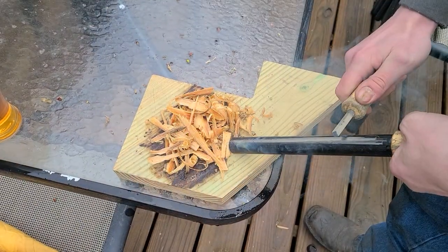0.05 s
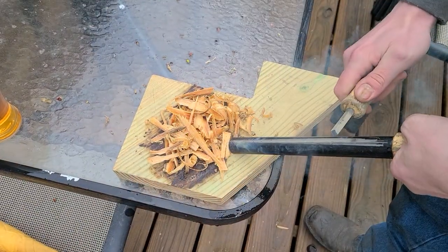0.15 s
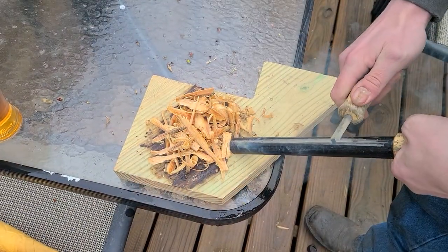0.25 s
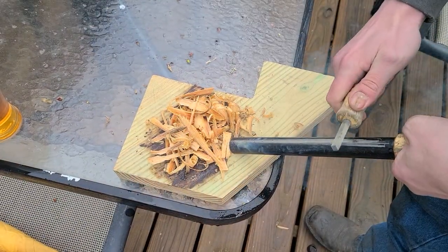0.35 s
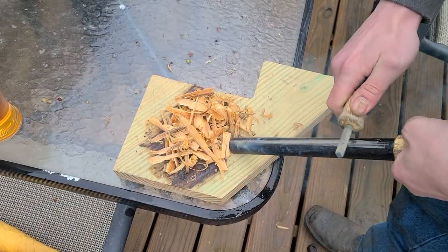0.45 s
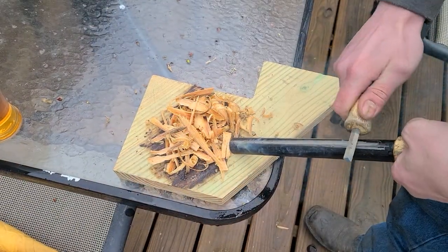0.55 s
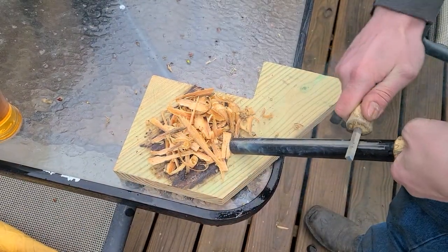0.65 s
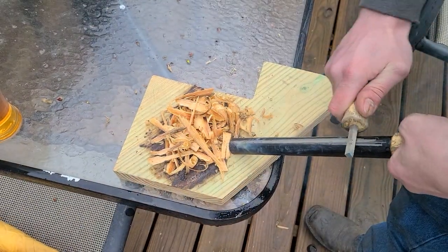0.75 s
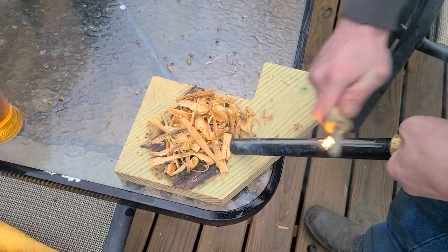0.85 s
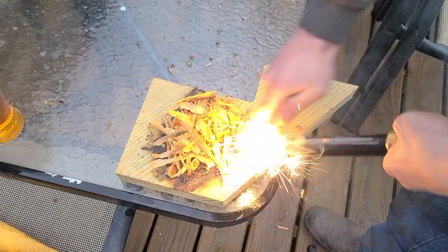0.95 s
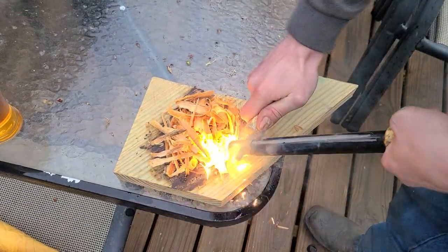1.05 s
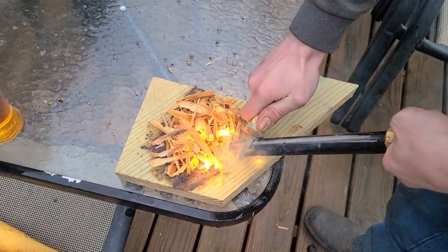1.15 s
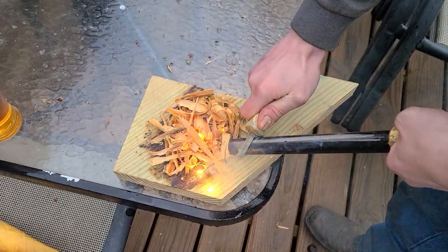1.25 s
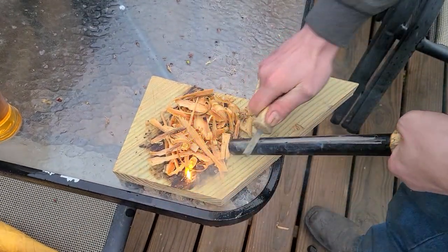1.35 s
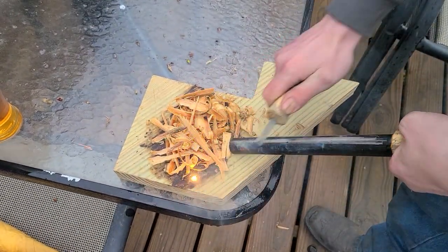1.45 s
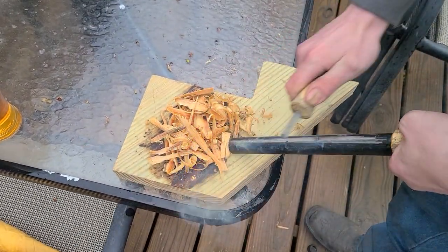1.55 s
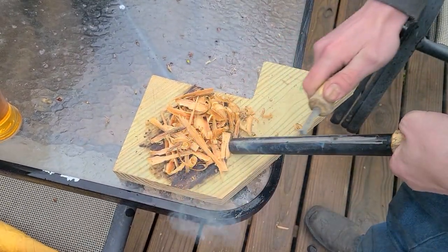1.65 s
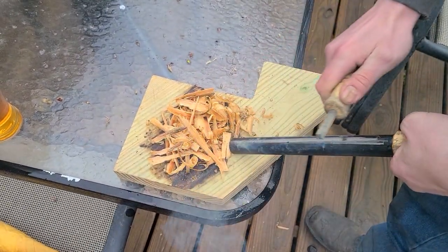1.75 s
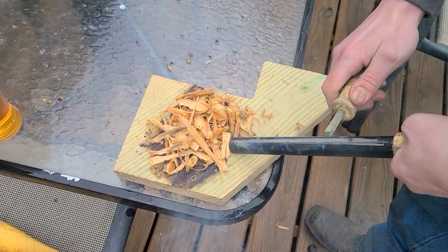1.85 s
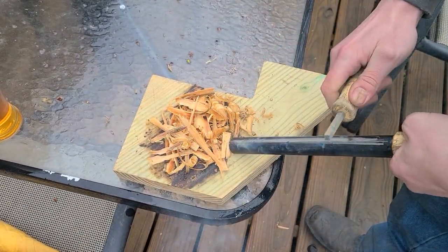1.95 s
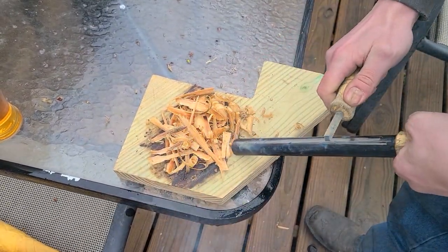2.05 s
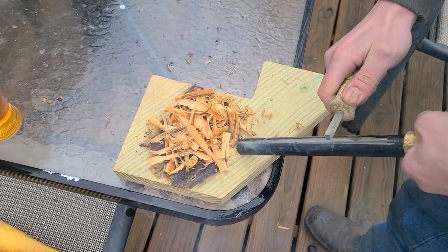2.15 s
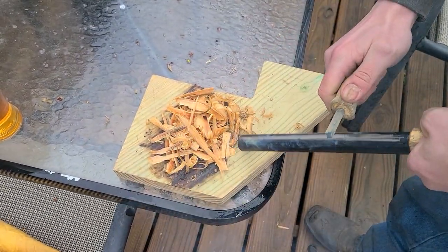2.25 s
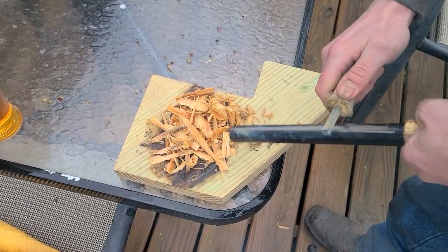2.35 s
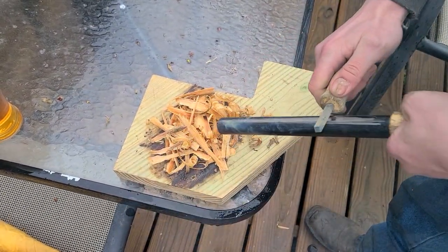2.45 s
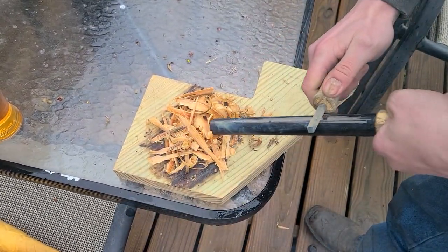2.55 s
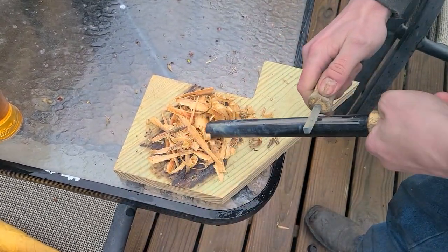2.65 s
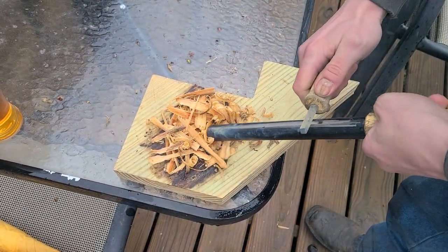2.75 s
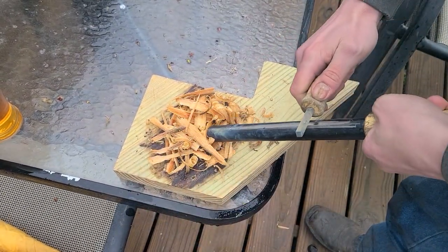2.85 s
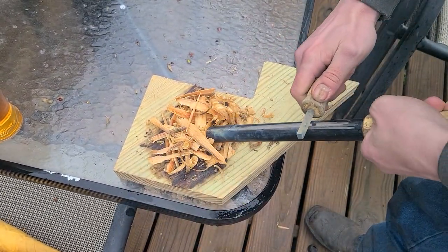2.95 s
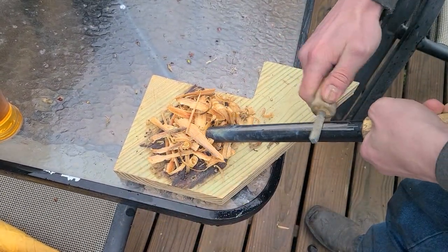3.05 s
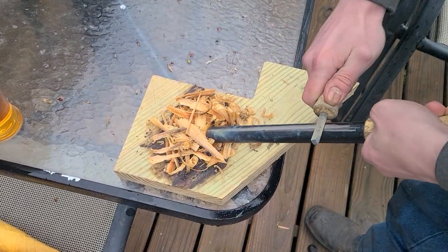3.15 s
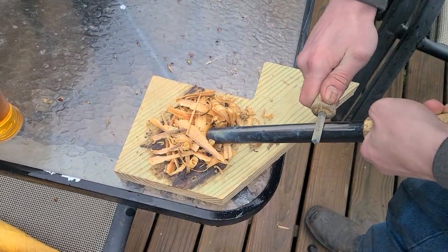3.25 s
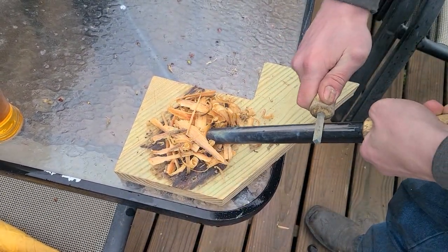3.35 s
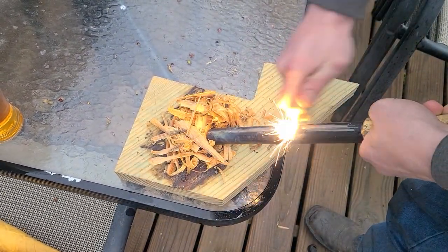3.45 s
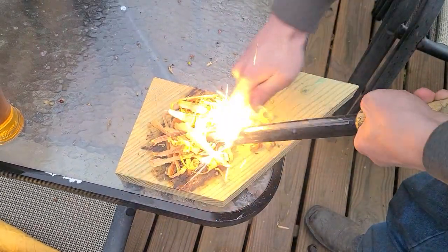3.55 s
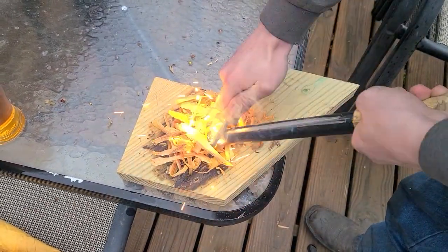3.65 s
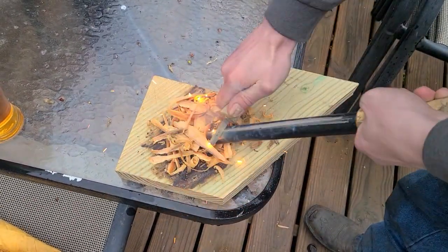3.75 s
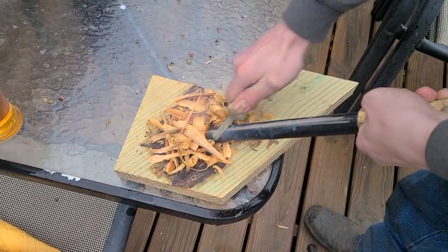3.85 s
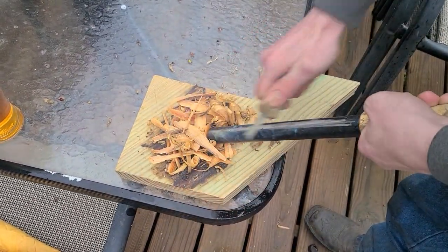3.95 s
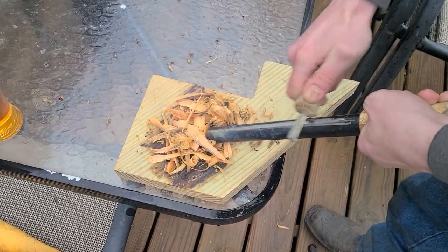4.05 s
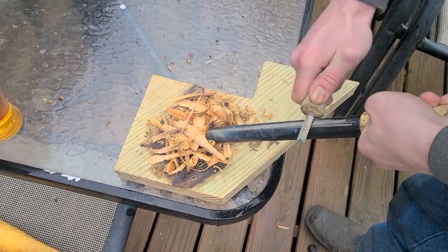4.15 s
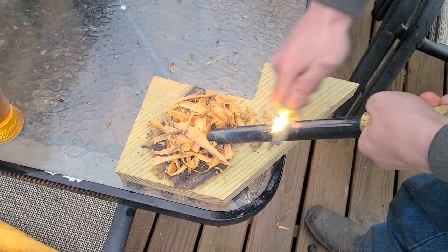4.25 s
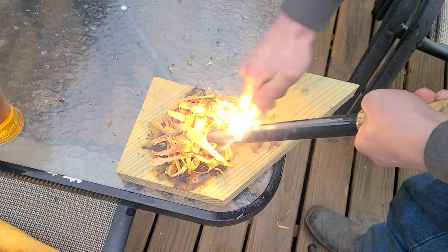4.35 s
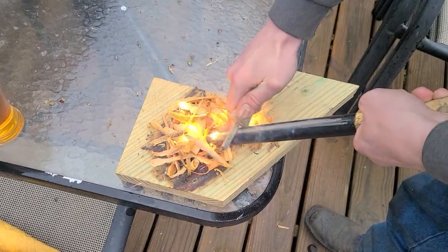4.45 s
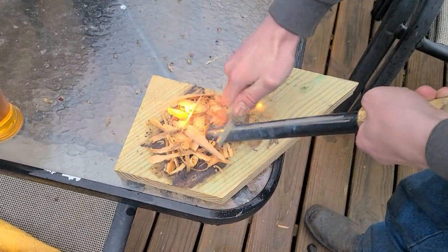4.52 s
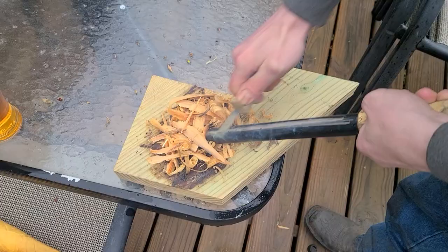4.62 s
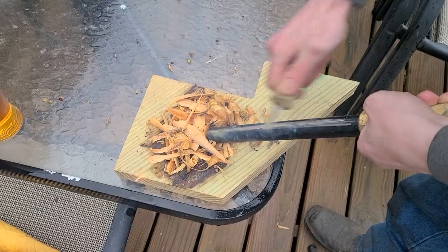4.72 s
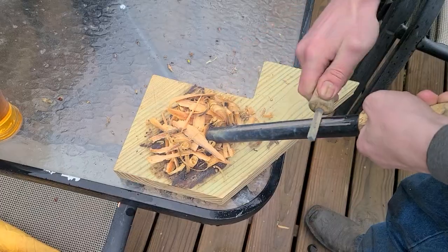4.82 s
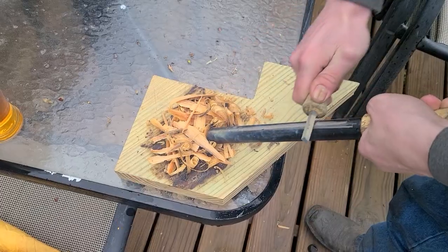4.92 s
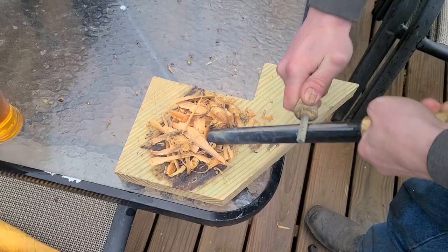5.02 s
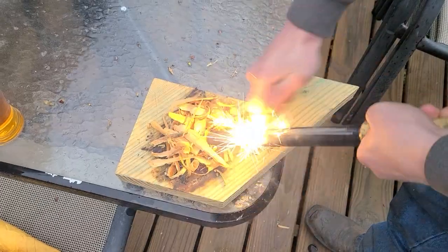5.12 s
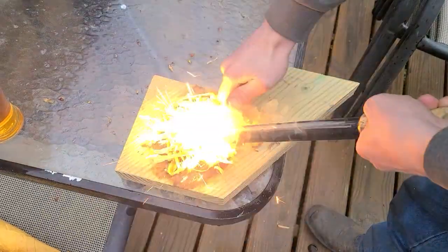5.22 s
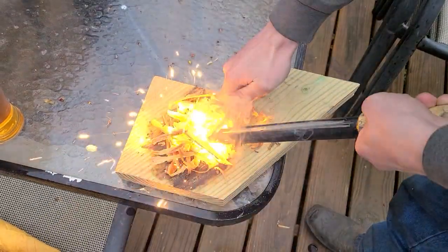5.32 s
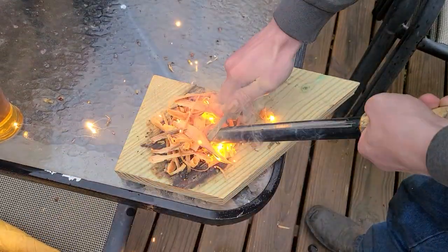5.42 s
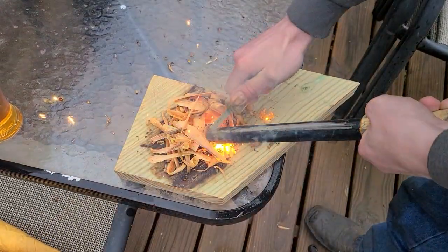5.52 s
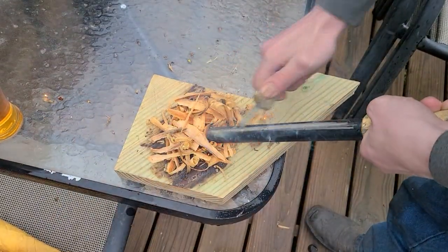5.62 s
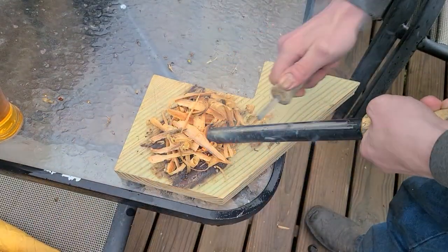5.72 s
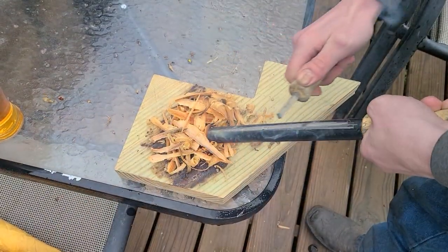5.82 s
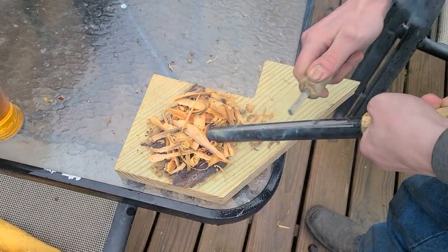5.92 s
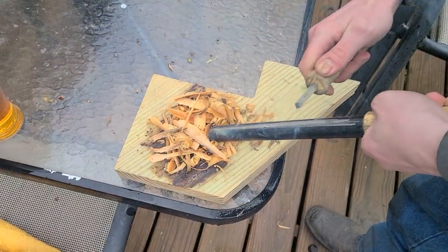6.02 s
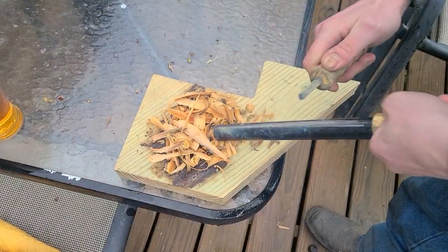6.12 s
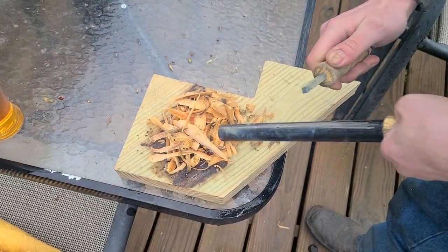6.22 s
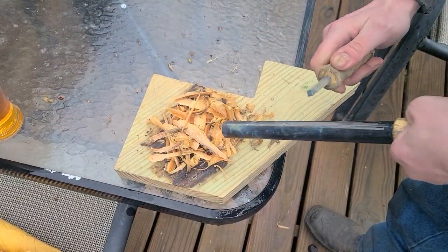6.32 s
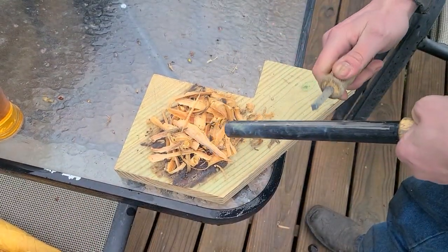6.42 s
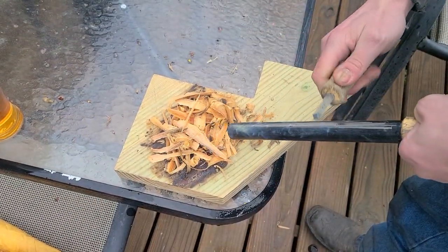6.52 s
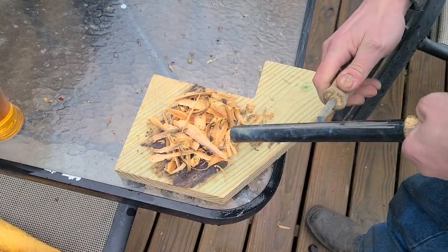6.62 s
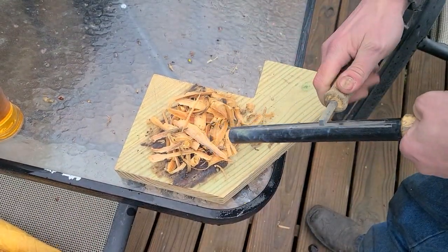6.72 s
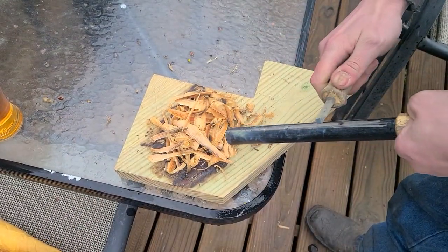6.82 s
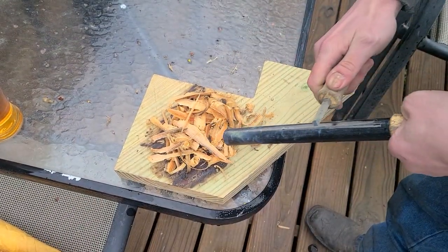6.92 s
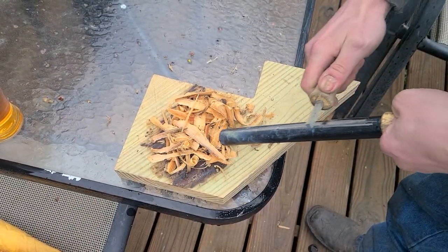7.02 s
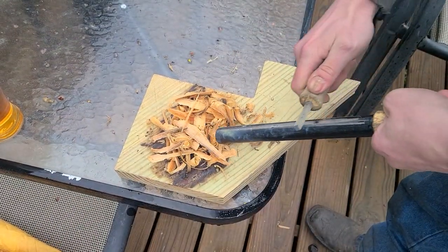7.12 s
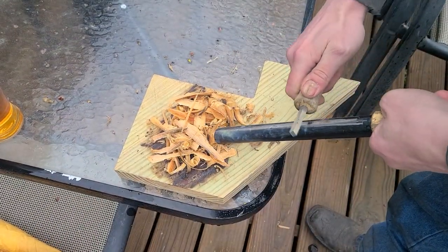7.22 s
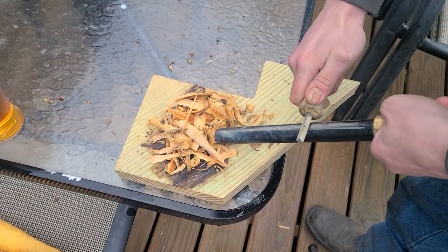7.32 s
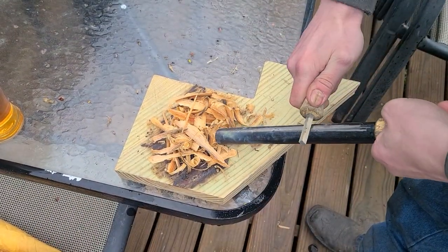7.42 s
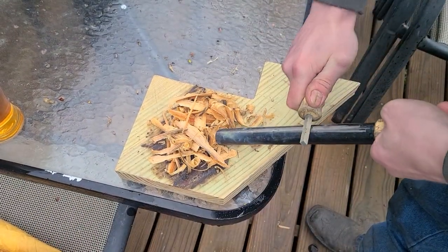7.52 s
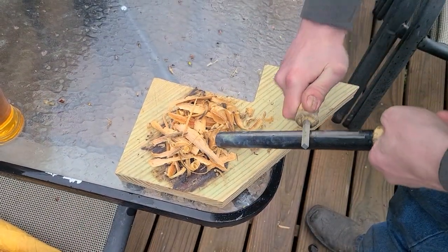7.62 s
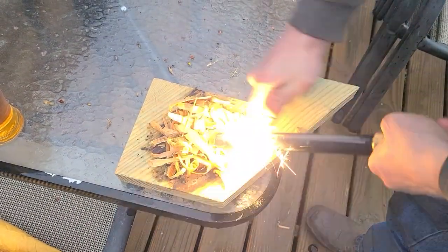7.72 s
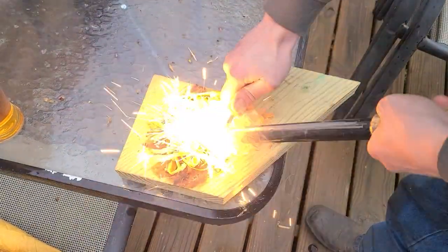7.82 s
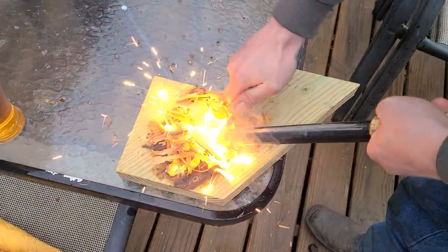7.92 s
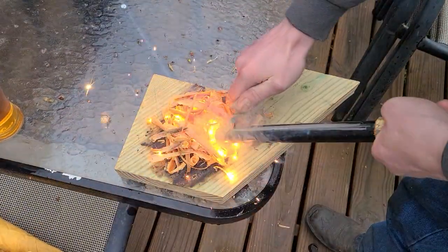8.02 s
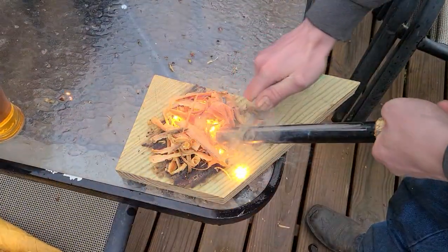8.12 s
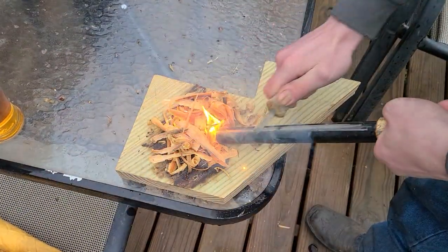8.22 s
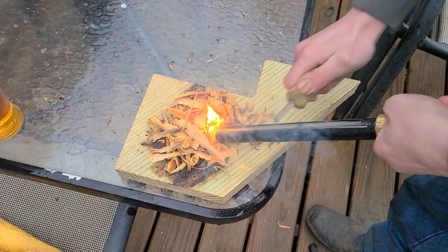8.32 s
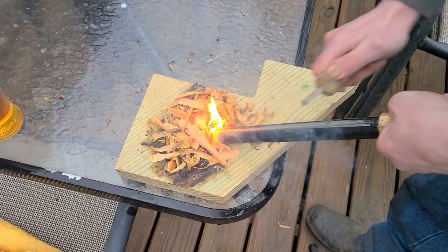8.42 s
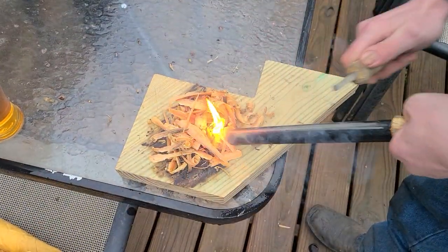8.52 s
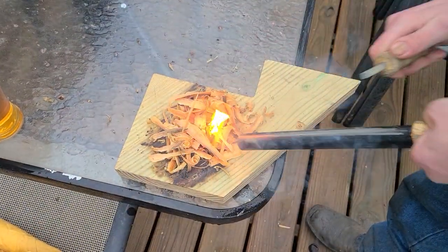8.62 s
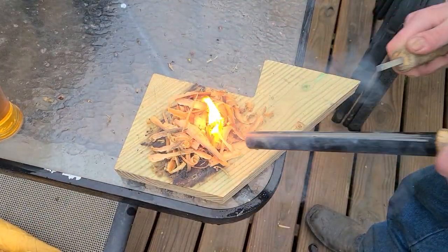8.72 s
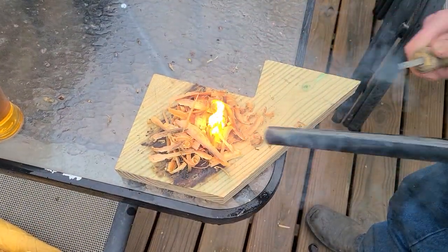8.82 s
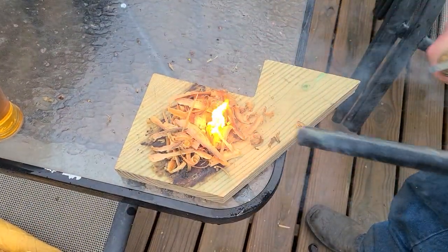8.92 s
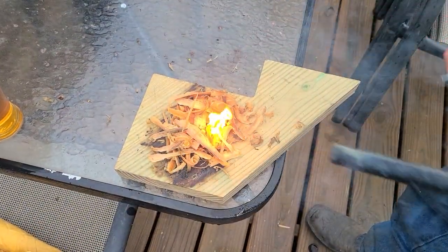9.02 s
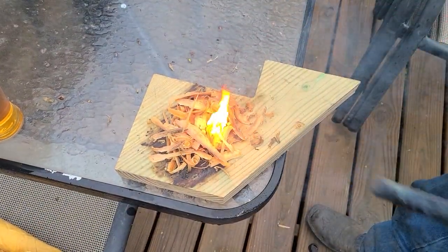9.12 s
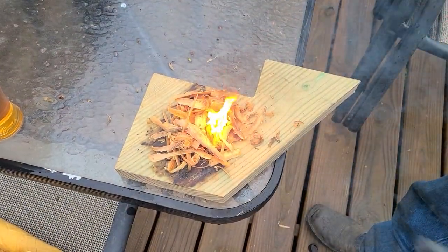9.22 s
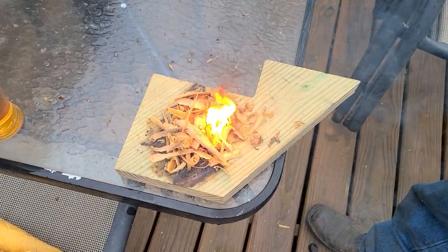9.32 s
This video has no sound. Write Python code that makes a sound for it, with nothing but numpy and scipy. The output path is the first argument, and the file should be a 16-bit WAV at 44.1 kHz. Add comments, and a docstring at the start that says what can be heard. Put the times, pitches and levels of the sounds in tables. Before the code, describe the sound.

A wren's quick chirping phrases echo among houses above distant traffic and a low engine hum. Nearby, small ticks and bright metallic taps lead into gritty scrapes of steel on a rod, spaced irregularly, with one more squealing and the final one loud and woody. Each leaves a light dying crackle. Close handheld stereo pickup in open air, bright hand sounds leaning right.

```python
"""A wren sings in gliding notes among echoing houses over droning traffic, and small steel ticks begin.
Then sharp taps, ringing steel modes, set a scraper on a thick spark rod, and five strokes drive it along:
gritty noise gives the hiss, resonances fed by uneven catches give the rasp and squeal.
The rod's tip shakes a board on a glass garden table, adding dull knocks; light crackle fills the gaps.
A phone's two microphones hear the treble of the hands from the right."""
import sys
import numpy as np
from scipy import signal
from scipy.fft import rfft, irfft, next_fast_len
from scipy.io import wavfile
from scipy.ndimage import uniform_filter1d, map_coordinates

SR = 44100
rng = np.random.default_rng(int(sys.argv[2]) if len(sys.argv) > 2 else 0)


def bounce(signal):
    """Save signal as a 16-bit WAV file at the path given by the first command-line argument."""
    frames = np.transpose(np.atleast_2d(signal))
    limited = np.clip(frames, -1, 1)
    pcm = np.round(limited * 32767).astype(np.int16)
    wavfile.write(sys.argv[1], SR, pcm)


def nominal_scale(level):
    """Amplitude ratio for a level in decibels (scalar or array-like)."""
    x = np.asarray(level, float) / 20
    return 10 ** x


N = 413216  # length [samples]


def unit(x):
    """Bring to rms 1."""
    return x / np.sqrt(np.mean(x ** 2) + 1e-20)


def along(points, hz):
    """Read (frequency, value) points on a log frequency axis."""
    f, v = np.transpose(points)
    return np.interp(np.log(hz + 1), np.log(f + 1), v)


def curves(rows):
    """One value per sample for each column after the time."""
    s, *cols = np.transpose(rows)
    return [np.interp(np.arange(N) / SR, s, c) for c in cols]


def spans(tables, fade):
    """Join tables of levels, 30 dB down between them; each dies five times slower than it starts."""
    def hushed(s, row):
        return (s, *np.subtract(row[1:], 30))

    rows = []
    for table in tables:
        first, last = table[0], table[-1]
        rows += [hushed(first[0] - fade, first), *table, hushed(last[0] + 5 * fade, last)]
    return curves(sorted(rows))


def wobble(rate):
    """A smooth random curve, rate knots a second."""
    return map_coordinates(rng.standard_normal(int(N * rate / SR) + 4), [np.arange(N) * rate / SR])


def gate(start, length, rise):
    """Time since the start, and a gain that swells over rise, holds and dies away over rise."""
    t = np.arange(N) / SR - start
    return t, np.clip(np.minimum(t, length + rise - t) / rise, 0, 1) ** 2


def filtered(x, response):
    """Shape x by a complex response of frequency."""
    m = next_fast_len(x.shape[-1] + SR // 2)
    spectrum = rfft(x, m) * response(np.fft.rfftfreq(m, 1 / SR))
    return irfft(spectrum, m)[..., :x.shape[-1]]


def modes(peaks):
    """Causal response of a few (frequency, width, level) resonances, alternating in sign."""
    def response(f):
        total = 0
        for k, (centre, width, db) in enumerate(peaks):
            damping = 1j * f * width
            total = total + (-1) ** k * nominal_scale(db) * damping / (centre * centre - f * f + damping)
        return total
    return response


def colour(spectrum):
    """Response of a (frequency, level) spectrum."""
    return lambda hz: nominal_scale(along(spectrum, hz))


def spread(pair, response, alike):
    """Two unrelated signals coloured and mixed to left and right, alike by frequency, rms 1."""
    def mid_side(hz):
        angle = np.arccos(np.clip(along(alike, hz), -1, 1)) / 2
        return response(hz) * [np.cos(angle), np.sin(angle)]

    mid, side = filtered(pair, mid_side)
    return unit(np.array([mid + side, mid - side]))


def grit(rate, scatter_db, smooth):
    """Noise over a smooth bed with tiny catches of unequal size, rate a second, shared by both sides."""
    sizes = nominal_scale(scatter_db * np.clip(rng.standard_normal(N), -2, 2))
    catches = (rng.random(N) < rate / SR) * sizes
    bursts = np.sqrt(np.abs(uniform_filter1d(catches ** 2, size=40)))
    return rng.standard_normal((2, N)) * (smooth + unit(bursts))


def patchy(x, depth_db):
    """Resonances shift as the contact moves: random gain in patches of pitch and time, rms 1."""
    z = signal.stft(x, nperseg=256)[2]
    field = uniform_filter1d(rng.standard_normal(z.shape[1:]), size=3, axis=0)
    field = uniform_filter1d(field, size=9, axis=1)
    return unit(signal.istft(z * nominal_scale(depth_db * unit(field)), nperseg=256)[1][:, :N])


def tail(length, t60):
    """Two dying noises, scaled to energy 1 by the left one."""
    t = np.arange(round(length * SR)) / SR
    x = rng.standard_normal((2, len(t))) * nominal_scale(-60 * t / t60)
    return x / np.linalg.norm(x[0])


def add(track, s, sound):
    """Mix a stereo sound in at time s."""
    i = round(s * SR)
    sound = sound[:, max(-i, 0):N - i]
    track[:, max(i, 0):max(i, 0) + sound.shape[1]] += sound


# strokes, one table each:
# (time [s], sliding speed as hiss level [dB], push on the board [dB], lean onto the table top [dB])
STROKES = [
    [(0.91, -77, -56, -52), (0.932, -56, -61, -60), (0.954, -45, -47.5, -52), (0.994, -39.5, -31, -37.5),
     (1.048, -33.5, -38, -52), (1.074, -38, -29.5, -35.5), (1.096, -38.5, -31, -40.5),
     (1.128, -45, -39, -51)],
    [(3.51, -74, -52, -59), (3.526, -51, -62, -57), (3.55, -43, -41.5, -42), (3.586, -37, -41.5, -48),
     (3.712, -40.5, -49, -33), (3.73, -46.5, -52.5, -37), (3.758, -55, -50, -53.5), (3.78, -77, -49.5, -44)],
    [(4.31, -65.5, -52, -52), (4.352, -35, -49, -48.5), (4.388, -40.5, -45, -65), (4.51, -42.5, -49.5, -33),
     (4.556, -73, -53, -46), (4.602, -52, -50.5, -43), (4.678, -70, -64, -50), (4.7, -82, -54.5, -50.5)],
    [(5.15, -68, -46.5, -54), (5.17, -36, -36, -47), (5.206, -38, -34.5, -42), (5.282, -28, -36.5, -29),
     (5.334, -42, -35, -45), (5.382, -54.5, -53, -55), (5.406, -66, -54, -73), (5.42, -55, -62, -50)],
    [(7.775, -45.5, -55, -53), (7.791, -41.5, -29.5, -44), (7.817, -32, -28.5, -37.5),
     (7.841, -29, -28, -33.5), (7.879, -31.5, -23.5, -29.5), (7.911, -41.5, -33.5, -45.5),
     (7.96, -50, -58, -49.5)],
]
# how the edge is held in each stroke: (blade rasp [dB], blade squeal [dB], rod rasp [dB])
GRIPS = [(2, 0.5, 1.5), (0.5, 5, -3), (4, -2.5, -.6), (1.1, -1, -0.1), (1.5, 0.3, 3.5)]
# colour of the torn grains: (frequency [Hz], relative level [dB])
HISS_SPECTRUM = [(2820, -27.5), (4800, -12), (5890, -0.5), (6640, -1.5), (7300, -0.5), (8220, -10.5),
                 (9180, -16), (12000, -8), (13400, -10), (15800, -17)]
# scraper blade, lower modes: (frequency [Hz], width [Hz], level [dB])
BLADE_MODES = [(2705, 750, -1), (3720, 300, 0)]
# scraper blade, upper modes: (frequency [Hz], width [Hz], level [dB])
SQUEAL_MODES = [(3747, 420, -16), (4180, 740, 5)]
# rod: (frequency [Hz], width [Hz], level [dB])
ROD_MODES = [(760, 470, -9), (1230, 344, 0), (1606, 450, -0.5), (1950, 510, -3)]
# board under the tip: (frequency [Hz], width [Hz], level [dB])
BOARD_MODES = [(307, 41, -5), (380, 35, -1.5), (447, 74, -3.5)]
# glass table top: (frequency [Hz], width [Hz], level [dB])
TABLE_MODES = [(113, 110, -5.5), (183.4, 25, 4.5), (237.6, 17, -2.5)]
# stereo width of the hands: (frequency [Hz], left-right likeness [-1 to 1])
NEAR_ALIKE = [(60, 0.99), (130, 0.99), (290, 1), (640, 0.73), (1410, 0.63), (3100, 0.56), (6820, 0.27),
              (15000, 0.03)]


def strokes():
    """The edge tears grains off the rod: a dense hiss; blade and rod rasp; the tip shakes board and table."""
    slide_db, push_db, lean_db = spans(STROKES, fade=0.024)
    holds = []
    for rows, grip in zip(STROKES, GRIPS):
        start, end = rows[0][0], rows[-1][0] + .1
        holds += [(start, 0, *grip), (end, end - start, *grip)]
    since, blade_db, squeal_db, rod_db = curves(holds)
    force_db = np.maximum(push_db, lean_db)

    def drive(offset_db, force_share, rise_db_s):
        """Level led by sliding, partly by force, rising as the scraper nears the tip."""
        return offset_db + slide_db + force_share * (force_db - slide_db) + rise_db_s * since

    def skips(peaks):
        return spread(grit(220, scatter_db=3.5, smooth=2.0), modes(peaks), NEAR_ALIKE)

    chatter = wobble(60)  # the edge skips unevenly
    grains = spread(grit(1500, scatter_db=2.0, smooth=0.99), colour(HISS_SPECTRUM), NEAR_ALIKE)
    hiss = nominal_scale(2.6 + slide_db + 0.71 * chatter) * patchy(grains, depth_db=2.5)
    blade_gain = nominal_scale(drive(-5, force_share=0.14, rise_db_s=8.4) + blade_db + 1.3 * chatter)
    blade = blade_gain * patchy(skips(BLADE_MODES), depth_db=1.0)
    rod_gain = nominal_scale(drive(-4, force_share=0.27, rise_db_s=17) + rod_db + 4.2 * wobble(50))
    rod = rod_gain * patchy(skips(ROD_MODES), depth_db=1.5)
    squeal_gain = nominal_scale(drive(-5.5, force_share=0.14, rise_db_s=8) + squeal_db + 0.84 * wobble(45))
    squeal = squeal_gain * patchy(skips(SQUEAL_MODES), depth_db=0.5)
    board = nominal_scale(push_db - 1) * skips(BOARD_MODES)
    table = nominal_scale(lean_db + 2.2) * skips(TABLE_MODES)
    return hiss + blade + rod + squeal + board + table


# scraper set on the rod:
# (time [s], level [dB], modes below 3300 Hz [dB], modes above 7000 Hz [dB], left over right [dB])
TAPS = [(0.6339, -23.5, 6.5, -23, -8.5), (1.194, -27.5, -20, -6, -7), (3.1749, -11.5, 1.5, -14, -9),
        (4.2272, -3.5, -2.5, -21, -4.5), (4.9298, -7.5, -4.5, -22.5, -1), (7.385, -10, 0, -16.5, -4.5)]
# broad clack: (frequency [Hz], width [Hz], level [dB])
CLACK_MODES = [(1344, 960, -6), (2390, 580, 0.5), (3370, 780, -4), (4400, 660, -0.5), (5770, 530, 2.5),
               (7620, 750, 4), (10800, 900, 0.5)]
# ring of scraper and rod: (frequency [Hz], level [dB], t60 [s])
STEEL_RING = [(1420, -7.5, 0.011), (2145, -5.5, 0.023), (2420, -27, 0.092), (2747, -4.5, 0.024),
              (4405, -8.5, 0.037), (4700, -19, 0.017), (5460, -5, 0.01), (5780, -18.5, 0.05),
              (6030, -0.5, 0.0044), (7270, -10.5, 0.03), (10400, -0.5, 0.018), (12850, -4.5, 0.0033)]


def taps():
    """Each tap is a short clack and a faint ring, slightly retuned; the table top sends a duller smear."""
    out, t = np.zeros((2, N)), np.arange(SR // 8) / SR
    for s, db, low_db, top_db, pan_db in TAPS:
        def tilt(hz):
            return low_db if hz < 3300 else top_db if hz > 7000 else 0

        clack = modes([(hz * rng.normal(1, 0.011), w, g + tilt(hz)) for hz, w, g in CLACK_MODES])
        noise = .2 * rng.standard_normal((2, len(t))) * np.exp(-t / .001)
        blow = signal.unit_impulse(len(t), 24) + noise
        blow = uniform_filter1d(blow, size=2)  # steel meets steel for a few hundredths of a millisecond
        struck = filtered(blow, clack)
        struck = struck / np.abs(struck).max()
        ring = np.zeros_like(struck)
        for hz, level_db, t60 in STEEL_RING:
            wave = np.sin(2 * np.pi * hz * rng.normal(1, .012) * t + rng.normal(0, 1.0, (2, 1)))
            mode_db = level_db + tilt(hz) - 10.0 + rng.normal(0, 1.9)
            ring += nominal_scale(mode_db - 60 * t / t60) * wave * (1 - np.exp(-t / 0.0011))
        smear = signal.fftconvolve(struck + 0.47 * ring, tail(.15, t60=0.11), axes=1)
        smear = filtered(smear, lambda hz: 1 / (1 + 1j * hz / 6000))  # dulled above 6 kHz
        noise_ahead = unit(filtered(rng.standard_normal((2, len(t))), clack))
        noise_ahead = noise_ahead * np.exp((t - t[-1]) / 0.0041)
        gain = nominal_scale(db + 6.5 + np.array([[pan_db], [-pan_db]]) / 2)
        add(out, s - t[-1], gain * nominal_scale(-22.0) * noise_ahead)  # faint noise just ahead of the clack
        add(out, s, gain * (struck + ring))
        add(out, s + .002, gain * nominal_scale(-5.0) * smear)
    return out


# small ticks of steel edge, shavings and sparks: (time [s], level [dB], body over bright part [dB])
TICKS = [(.557, -50, -5.5), (.571, -43, -2), (.5838, -43.5, -4.5), (.6146, -52, -1), (1.2483, -30.5, -15),
         (1.3245, -42, 2), (1.3564, -45, 0.5), (1.5095, -49, -1), (1.5272, -35.5, -1.5), (2.496, -40, -10),
         (2.739, -47, -1), (2.8539, -32.5, -15.5), (2.8772, -32, -20), (2.9906, -33.5, -10.5),
         (3.027, -48, -1), (3.1086, -16, -25.5), (3.25, -40, -16), (3.3099, -31, -20), (3.3274, -37, -14.5),
         (4.3535, -23, -7), (4.4742, -22.5, 2.5), (4.5397, -41, -10.5), (4.6029, -39, -9),
         (5.3851, -42, 2.5), (5.5129, -39, -1.5), (5.557, -37.5, -4), (5.718, -47, -1.5),
         (5.7544, -35.5, -4.5), (5.7978, -42.5, -12), (6.126, -55, 4), (7.1112, -42.5, 7),
         (7.141, -34, -5.5), (7.2432, -51.5, 12), (7.2898, -57.5, 13), (7.7029, -43, 7), (7.7614, -57, -11),
         (7.9992, -31, -2.5), (8.019, -55.5, 5), (8.1833, -40.5, 2), (8.2487, -44, -3.5), (8.92, -49, -8.5),
         (9.195, -40.5, -14.5), (9.3362, -50.5, 11)]


def ticks():
    """Very short noise clicks with a weak fizz, through two bright resonances and a lower body."""
    bright, body, t = np.zeros((2, N)), np.zeros((2, N)), np.arange(SR // 10) / SR
    for s, db, body_db in TICKS:
        decay = nominal_scale(-60 * t / 0.0032) + 0.21 * nominal_scale(-60 * t / 0.066)  # click and fizz, t60 [s]
        click = rng.standard_normal((2, len(t))) * decay
        add(bright, s, nominal_scale(db - 0.5) * click)
        add(body, s, nominal_scale(db + body_db + 9) * click)
    bright = filtered(bright, modes([(6440, 910, 0.42), (12700, 1000, -1.5)]))
    return bright + filtered(body, modes([(3950, 1600, 0.0037)]))


# rod tip on the board: (time [s], level [dB])
KNOCKS = [(1.131, -25), (1.156, -10.5), (1.19, -22), (1.545, -25), (3.651, -26), (3.674, -25), (4.583, -20),
          (5.167, -28.5), (7.699, -23.5), (8.613, -30), (8.906, -28.5), (9.195, -28.5), (9.332, -31)]


def knocks():
    """Dull blows with a short rattle ring board and table top; the rod itself gives a brief clack."""
    blows, clacks, t = np.zeros((2, N)), np.zeros((2, N)), np.arange(SR // 20) / SR
    for s, db in KNOCKS:
        soft = (t / 0.00023) * np.exp(-t / 0.00032)
        rattle = 0.62 * uniform_filter1d(rng.standard_normal(len(t)), size=16) * nominal_scale(-60 * t / 0.14)
        add(blows, s, nominal_scale(db + 11.5) * np.array([soft + rattle] * 2))
        add(clacks, s, nominal_scale(db - 1 - 60 * t / 0.0098) * rng.standard_normal((2, len(t))))
    rod = filtered(clacks + nominal_scale(-6) * blows, modes(ROD_MODES))
    return filtered(blows, modes(TABLE_MODES + BOARD_MODES)) + rod


# light sliding, shavings and dying sparks between strokes:
# (time [s], length [s], level [dB], fading, negative grows [dB/s])
RUSTLE = [(.52, .38, -80.5, 3), (1.215, 0.26, -71.5, 25), (2.594, 0.38, -78, -15), (3.047, .42, -69, 25),
          (3.78, .4, -73, 14), (4.96, 0.14, -64.5, 14.5), (5.427, .42, -65, 28.5), (6.066, .14, -80.5, 4.5),
          (7.08, 0.21, -59.5, 44), (7.613, 0.13, -75, 6), (7.938, 0.505, -61, 22.5), (8.478, 0.98, -70, 19),
          (9.098, .3, -79, -21)]


def rustle():
    """A faint bright crackle of sparse catches that swells in quickly, then fades or grows."""
    gain, rise = np.zeros(N), 0.034  # rise [s]
    for s, length, db, fading_db in RUSTLE:
        t, shape = gate(s - rise, length + rise, rise)
        gain += nominal_scale(db + 4.0 - fading_db * np.clip(t, 0, 1)) * shape
    flicker_db = 3 * wobble(30)
    crackle = spread(grit(300, scatter_db=7, smooth=1.5), colour(HISS_SPECTRUM), NEAR_ALIKE)
    return gain * nominal_scale(flicker_db) * crackle


# the wren's phrase, one table a note: (time after the phrase begins [s], pitch [Hz], level [dB])
NOTES = [
    [(.004, 7100, -68), (.011, 6190, -53), (.017, 5670, -46), (.025, 5250, -48.5), (.031, 5200, -56)],
    [(.037, 3876, -48), (.045, 4016, -40.5), (.05, 4165, -40.5), (.055, 4310, -34.5), (.058, 4520, -57),
     (.062, 4830, -43), (.07, 4920, -54.5)],
    [(.092, 2490, -52.5), (.104, 2568, -38), (.11, 2366, -40.5), (.114, 2160, -51), (.12, 1936, -36),
     (.126, 1834, -56.5), (.134, 1714, -45), (.146, 1580, -60)],
    [(.192, 3846, -57), (.205, 3825, -43.5), (.216, 3686, -35.5), (.229, 3584, -36), (.237, 3383, -37.5),
     (.243, 3250, -55.5)],
    [(.247, 3073, -43.5), (.262, 2955, -32.5), (.28, 2925, -35.5), (.303, 2895, -32), (.318, 2877, -33.5),
     (.33, 2910, -55)],
]
# phrases: (time [s], opening notes [dB], closing notes [dB], extra pause before the closing [s])
PHRASES = [(-.208, 0, 0, 0), (.16, 0, 1, .001), (.541, 0, 0, .001), (5.903, -4, -1.5, .004),
           (6.274, 0, 1, .001), (6.6425, 0, 0, -.001), (7.007, 0, .6, .002), (7.373, 0, .6, .004),
           (7.755, -1.5, 0, .01)]


def wren():
    """One phrase of five gliding notes, each time a little changed, with fresh echoes from trees and walls."""
    out, t = np.zeros((2, N)), np.arange(round(.38 * SR)) / SR
    for s, open_db, close_db, pause in PHRASES:
        song = np.zeros(len(t))
        # the thin first note follows the effort more steeply
        efforts = [3.2 * open_db, open_db, open_db, close_db, close_db]
        for k, (note, db, late) in enumerate(zip(NOTES, efforts, [0] * 3 + [pause] * 2)):
            at, hz, level_db = np.transpose(note)
            pitch = np.interp(t - late, at, hz * rng.normal(1, 0.0046))
            if k == 0:  # only the first note flutters, by this share of its pitch
                pitch = pitch * (1 + 0.011 * unit(uniform_filter1d(rng.standard_normal(len(t)), size=60)))
            phase = 2 * np.pi * np.cumsum(pitch) / SR
            gain = np.sqrt(2) * nominal_scale(db + np.interp(t - late, at, level_db, -120, -120))
            gain = gain * nominal_scale(rng.normal(0, 0.74))
            song += uniform_filter1d(gain, size=88) * (np.sin(phase) + .008 * np.sin(2 * phase))
        song = np.array([song, song])
        add(out, s, nominal_scale(1.0) * song)
        add(out, s + .004, nominal_scale(-1.5) * signal.fftconvolve(song, tail(0.14, t60=0.067), axes=1))
        add(out, s + .02, nominal_scale(-5.0) * signal.fftconvolve(song, tail(1.2, t60=0.72), axes=1))
    return out


# swell of the far traffic: (time [s], level [dB])
TRAFFIC = [(0, -49), (.83, -50.5), (1.17, -48.5), (2.32, -48), (3.76, -48.5), (4.96, -50.5), (5.35, -48),
           (5.82, -52), (7.75, -54), (7.93, -46.5), (8.17, -51.5), (9.37, -53.5)]
# colour of the low rumble: (frequency [Hz], relative level [dB])
RUMBLE_SPECTRUM = [(12, -36), (20, -9.5), (54, 3.5), (81, 5.5), (140, -4), (193, -8), (236, -16.5),
                   (300, -14), (390, -37.5), (660, -120)]
# colour of the tyre roar: (frequency [Hz], relative level [dB])
ROAR_SPECTRUM = [(120, -23), (200, -2.5), (278, -10), (346, -5.5), (386, -5.5), (656, -9), (746, -5),
                 (964, -9.5), (1160, -4.5), (2000, -12), (3340, -18.5), (5780, -34), (6810, -27),
                 (8490, -45.5), (15800, -39)]
# a far engine's low note swells and fades: (time [s], length [s], pitch [Hz], level [dB])
ENGINE = [(-.1, 0.22, 76, -52.5), (0.452, 1.85, 71.5, -42), (2.505, 0.54, 68, -46), (3.503, 0.36, 72, -55),
          (4.244, 1.53, 69.7, -50.5), (6.1, 1.64, 71, -54), (8.547, 1, 69.8, -52)]
# machine hum: (time [s], level [dB])
HUM = [(0, -55), (.81, -57), (1.12, -50.5), (2.42, -57.5), (3.16, -77), (3.65, -56), (4.75, -53.5),
       (9.37, -53.5)]
# stereo width of the distance: (frequency [Hz], left-right likeness [-1 to 1])
FAR_ALIKE = [(60, 0.97), (130, 0.98), (290, 0.88), (640, 0.41), (1410, -0.055), (3100, -0.073),
             (6820, -0.037), (15000, 0.03)]


def traffic():
    """Rumble and tyre roar of coloured noise, an engine's wavering low note, a narrow hum with its octave."""
    far_db, = curves(TRAFFIC)

    def distant(spectrum):
        return spread(rng.standard_normal((2, N)), colour(spectrum), FAR_ALIKE)

    rumble = nominal_scale(far_db + 3 + 1.52 * wobble(3.035)) * distant(RUMBLE_SPECTRUM)
    roar = nominal_scale(far_db + 4 + .7 * wobble(7.6)) * distant(ROAR_SPECTRUM)
    engine, drift = np.zeros(N), np.cumsum(1.032 * wobble(3)) / SR  # drift [cycles]
    for s, length, hz, db in ENGINE:
        t, shape = gate(s, length, rise=0.092)
        engine += np.sqrt(2) * nominal_scale(db) * shape * np.sin(2 * np.pi * (hz * t + drift))
    engine = engine * nominal_scale(1.3 * wobble(11))
    phase = 2 * np.pi * np.cumsum(183.5 + 1.51 * wobble(4)) / SR
    hum_gain = nominal_scale(curves(HUM)[0] + 3.5 + 3.3 * wobble(11))
    hum = hum_gain * (np.sin(phase) + 0.11 * np.sin(2 * phase))
    return rumble + roar + engine + hum


# balance of the hands at the microphones: (frequency [Hz], left over right [dB])
NEAR_SIDE = [(60, 2), (130, 1), (290, -2.5), (640, -1), (1410, 2.5), (3100, -10), (6820, -6), (15000, -8)]


def scene():
    """The hands are shaded from the left microphone in the treble; taps carry their own balance."""
    hands = strokes() + ticks() + knocks() + rustle()
    shade = lambda hz: nominal_scale(along(NEAR_SIDE, hz) * np.array([[.5], [-.5]]))
    return filtered(hands, shade) + taps() + wren() + traffic()


def top_cut(x):
    """Nothing passes above the cut-off."""
    return signal.sosfilt(signal.butter(12, 16710, fs=SR, output="sos"), x)


def record(dry):
    """The phone rounds off the highest peaks and drops everything above its band limit by 22 dB."""
    held = dry / (1 + np.abs(dry / .98) ** 6) ** (1 / 6)
    mix = filtered(held, lambda hz: np.where(hz < 15750, 1, nominal_scale(-22)))
    return top_cut(mix)


dry = scene()
out = record(dry)
bounce(out)
```